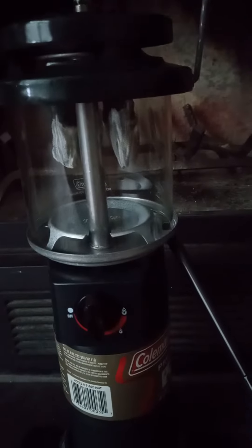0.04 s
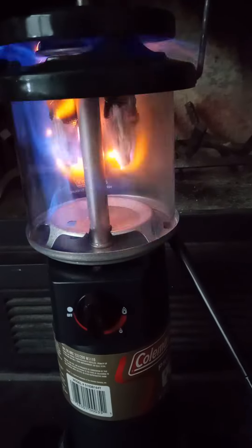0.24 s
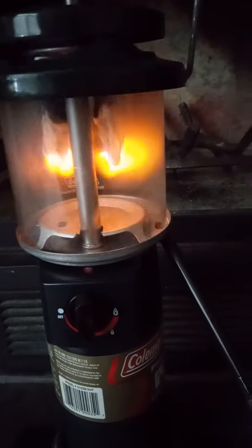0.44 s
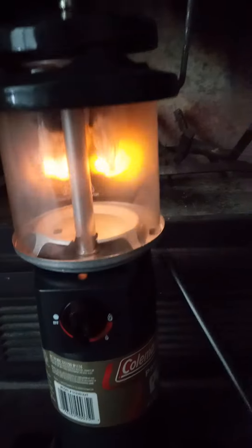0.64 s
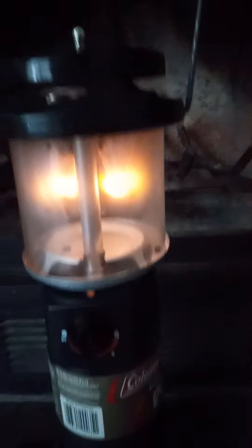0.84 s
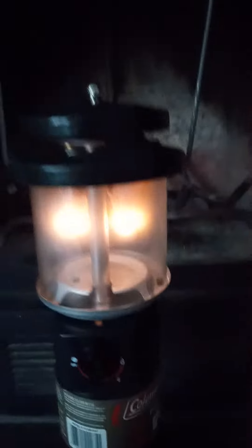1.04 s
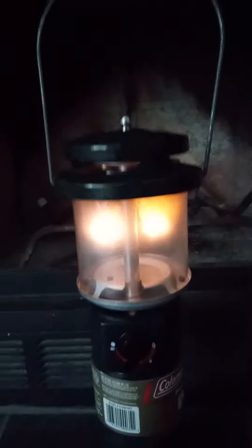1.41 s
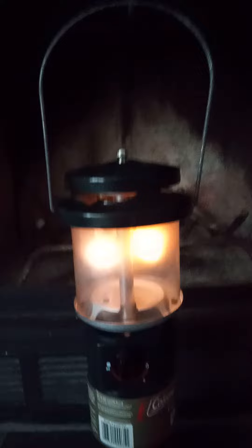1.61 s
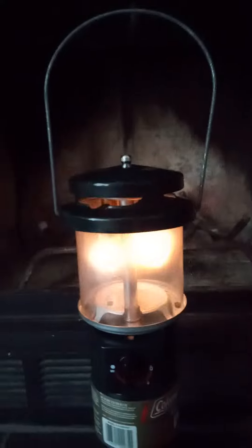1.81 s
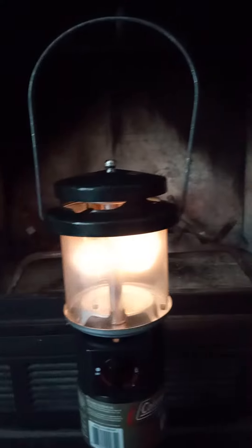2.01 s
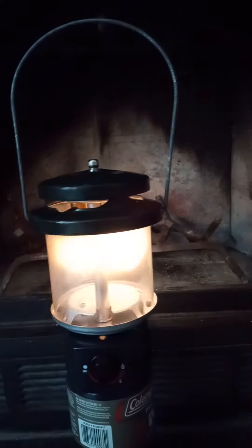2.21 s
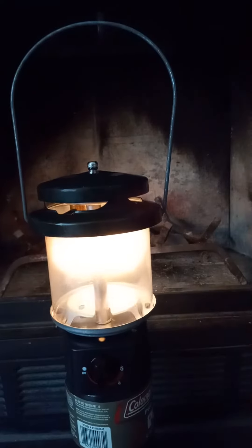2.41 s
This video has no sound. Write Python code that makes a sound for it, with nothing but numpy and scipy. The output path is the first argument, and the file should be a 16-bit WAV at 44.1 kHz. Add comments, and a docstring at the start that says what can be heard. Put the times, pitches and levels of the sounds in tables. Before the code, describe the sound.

Gas lantern igniting with a sharp click and low puff, steady hiss, and a brief clatter.

```python
"""On the hearth of a quiet room, a propane lantern is lit. The gas jet excites resonances of the burner
tubes, an igniter snaps, and the gas catches with a soft whoomph. Someone steps back with dull
footfalls, a faint scrape and a few ticks, and a small hard thing, probably the lighter, clatters down.
Steady sounds are noise shaped by resonance and filtering; impacts are brief impulses that excite
damped resonances and the reverberation of the room."""
import sys
import numpy as np
from scipy import signal
from scipy.fft import rfft, irfft, next_fast_len
from scipy.io import wavfile

SR = 44100
rng = np.random.default_rng(int(sys.argv[2]) if len(sys.argv) > 2 else 0)


def file_out(sig):
    """Save sig as 16-bit WAV at sys.argv[1]."""
    # one column per channel
    cols = np.atleast_2d(sig).T
    # limit, then scale
    lim = np.clip(cols, -1, 1)
    pcm = np.round(lim * 32767).astype(np.int16)
    wavfile.write(sys.argv[1], SR, pcm)


N = 112454
T = np.arange(N) / SR
FREQS = np.fft.rfftfreq(N, 1 / SR)
ROOM_PAN_DB = -4   # every pan is the left level minus the right level


def from_db(db):
    """Amplitude ratio of a level in decibels."""
    return 10 ** (np.asarray(db) / 20)


def pan(db):
    """Constant-power law: left and right gains with the given level difference."""
    gains = from_db([[db / 2], [-db / 2]])
    return gains / np.sqrt(np.mean(gains ** 2))


def unit_power(x):
    """Normalisation to a mean square of one."""
    return x / np.sqrt(np.mean(x ** 2) + 1e-20)


def unit_energy(x):
    """Normalisation of each channel to an energy of one."""
    return x / np.sqrt(np.sum(x ** 2, axis=-1, keepdims=True) + 1e-20)


def at_hz(points, hz):
    """Interpolation on a logarithmic frequency axis."""
    freqs, values = np.transpose(points)
    return np.interp(np.log(hz + 1e-6), np.log(freqs), values)


def coloured(x, spectrum):
    """Minimum-phase filtering: folding the cepstrum gives a causal filter with this spectrum."""
    size = 2 * next_fast_len(N)
    gain = from_db(at_hz(spectrum, np.fft.rfftfreq(size, 1 / SR)))
    cepstrum = irfft(np.log(gain))
    cepstrum[1:size // 2] *= 2
    cepstrum[size // 2 + 1:] = 0
    return irfft(rfft(x, size) * np.exp(rfft(cepstrum)))[..., :N]


def resonance(x, hz, width_hz):
    """Driven damped oscillator: two poles, unit gain at the peak."""
    r = np.exp(-np.pi * width_hz / SR)
    feedback = [1, -2 * r * np.cos(2 * np.pi * hz / SR), r * r]
    return signal.lfilter(np.array([1, 0, -1]) * (1 - r * r) / 2, feedback, x + 1e-18)


def body(x, modes):
    """Modal superposition: x drives parallel resonances (f/Hz, bandwidth/Hz, level/dB)."""
    return sum(from_db(db) * resonance(x, hz, width_hz) for hz, width_hz, db in modes)


def air_noise(coherent_below_hz=430):
    """Diffuse field: white noise whose two channels are coherent only at long wavelengths."""
    mid, side = rfft(rng.standard_normal((2, N)))
    coherence = np.exp(-(FREQS / coherent_below_hz) ** 2)
    spectrum = np.sqrt(1 + coherence) * mid + np.sqrt(1 - coherence) * side * [[1], [-1]]
    return irfft(spectrum, N) / np.sqrt(2)


def narrowband(hz, width_hz):
    """Narrow-band noise of unit power, from two resonances in cascade."""
    return unit_power(resonance(resonance(air_noise(), hz, width_hz), hz, width_hz))


def drift(rate_hz):
    """Slow random modulation: straight lines between Gaussian values."""
    return np.interp(T * rate_hz, np.arange(200), rng.standard_normal(200))


def decay(start_s, decay_s):
    """Exponential decay from a sudden onset."""
    return (T >= start_s) * np.exp(-np.maximum(T - start_s, 0) / decay_s)


def swell(middle_s, half_s):
    """Gaussian envelope."""
    return np.exp(-((T - middle_s) / half_s) ** 2)


def thump(start_s, hz, t60_s, rise_s):
    """Damped oscillation of one low mode, set gradually into motion."""
    age = np.maximum(T - start_s, 0)
    envelope = (1 - np.exp(-age / rise_s)) * np.exp(-np.log(1000) * age / t60_s)
    return envelope * np.sin(2 * np.pi * hz * age)


def room_response(build_s=0.034):
    """Reverberation: a diffuse field builds up, then decays exponentially in each band."""
    # reverberation times: f/Hz, T60/s
    reverberation = [(100, 0.4), (700, 0.27), (2000, 0.48), (6500, 0.48), (9500, 0.34), (14000, 0.32)]
    centres, t60s = np.transpose(reverberation)
    noise = rfft(air_noise())
    bands = [irfft(noise * at_hz(np.c_[centres, share], FREQS), N) for share in np.eye(len(centres))]
    tail = sum(band * from_db(-60 * T / t60) for band, t60 in zip(bands, t60s))
    return pan(ROOM_PAN_DB) * unit_energy(tail * (1 - np.exp(-T / build_s)))


def impact(start_s, pan_db, room, crack_s, echoes_s, echoes_db, room_db):
    """Impulsive source in a room: direct crack, dense early reflections, then reverberation."""
    lag_s = 0.0002915   # sound from the right arrives later on the left
    burst = rfft(rng.standard_normal(N) * decay(0, crack_s))
    flattened = irfft(burst / np.sqrt(np.abs(burst) + 1e-9), N)
    crack = unit_energy(flattened * (T < 10 * crack_s))
    direct = np.array([np.interp(T - lag_s, T, crack, left=0), crack])
    echoes = from_db(echoes_db) * unit_energy(air_noise() * decay(0, echoes_s))
    blow = pan(pan_db) * (direct + echoes) + from_db(room_db) * room
    return np.pad(blow, ((0, 0), (int(start_s * SR), 0)))[:, :N]


def room_hum():
    """Ambient noise: a steady background with its power in the bass."""
    # hum spectrum: f/Hz, level/dB
    spectrum = [(25, -102.5), (60, -54), (88, -52), (150, -61), (210, -57), (300, -66), (2000, -110)]
    return coloured(air_noise(), spectrum)


def gas_jet(flutter_db=2.6):
    """Jet noise excites the burner's resonances; their balance shifts as the listener backs away."""
    # hiss spectrum: f/Hz, level/dB
    hiss = [(250, -69.5), (500, -72.5), (900, -53), (1600, -69.5), (2650, -59), (3000, -71.5), (4300, -63),
            (8000, -72.5), (13500, -74), (15200, -68.5)]
    # modes of burner and globe: f/Hz, bandwidth/Hz, level/dB, pan/dB, growth/(dB/s)
    modes = [(656, 140, -63, 4, 0), (1082, 164, -63, 0.5, 0.5), (1840, 51, -79, -3.5, 0),
             (2210, 100, -63.5, -19, -1), (2332, 114, -59.5, -10, -1.5), (2313, 42, -63, -27, -3),
             (3380, 132, -72.5, 5, -1.5), (3570, 200, -71, -14, 0.5), (3917, 68, -72, -16, 4),
             (4884, 180, -77.5, -1, -3.5), (5680, 410, -75, -11.5, -1)]
    # gain on hiss and modes together: t/s, level/dB
    contour = [(0, 3.5), (.45, -0.5), (1.2, 3), (1.5, -0.5), (2.2, -1)]
    out = pan(-3.5) * coloured(air_noise(), hiss)
    for hz, width_hz, db, pan_db, growth_db_per_s in modes:
        note = pan(pan_db) * narrowband(hz, width_hz)
        out += note * from_db(db + growth_db_per_s * T + flutter_db * drift(rate_hz=15))
    return out * from_db(np.interp(T, *np.transpose(contour)))


def igniter(room):
    """Impulse excitation: the igniter's spring lets go, and the snap rings the lantern's modes."""
    # spring release: t/s, level/dB, pan/dB
    snaps = [(0.206, 14, -8.5)]
    # snap spectrum: f/Hz, level/dB
    spectrum = [(180, -72), (300, -34), (1080, -33), (1400, -14.5), (2150, 1), (3600, -2), (6100, -2),
                (8420, -15), (11000, -11), (13600, -19), (15500, -5.5)]
    # lantern modes: f/Hz, bandwidth/Hz, level/dB
    modes = [(2106, 70, -7), (2276, 240, -0.5), (3063, 59, 2.5), (3910, 57, -2.5), (5100, 130, 0),
             (6280, 94, -8.5)]
    contact = dict(crack_s=0.0005, echoes_s=0.0078, echoes_db=3.5, room_db=-2.8)
    blow = sum(from_db(db) * impact(s, pan_db, room, **contact) for s, db, pan_db in snaps)
    snap = coloured(blow, spectrum)
    return from_db(-3) * snap + from_db(-7.5) * body(snap, modes)


def ignition(catch_s=0.3355, rise_s=0.018, fall_s=0.044):
    """Combustion noise: the flame swells with a puff and a roar, then settles with a rumble and a flare."""
    # flame spectrum: f/Hz, level/dB
    spectrum = [(30, -24), (90, 4.5), (170, 0.5), (290, -10.5), (400, -4.5), (620, -7.5), (800, -4),
                (1050, -0.5), (1300, -35.5), (2600, -66)]
    # the young flame sounds the globe: centre t/s, half-length/s, level/dB
    flares = [(0.473, 0.028, -48.5)]
    envelope = np.exp(np.minimum((T - catch_s) / rise_s, (catch_s - T) / fall_s))
    flame = from_db(-19) * envelope * coloured(air_noise(), spectrum)
    puff = -from_db(-26) * thump(start_s=0.331, hz=103.4, t60_s=0.11, rise_s=0.01)
    roar = from_db(-45) * swell(middle_s=0.339, half_s=0.0444)
    afterburn = from_db(-61) * swell(middle_s=0.48, half_s=0.13)
    rumble = (roar + afterburn) * narrowband(hz=87, width_hz=53)
    flare = sum(from_db(db) * swell(s, half_s) for s, half_s, db in flares)
    globe = flare * narrowband(hz=679, width_hz=75)
    return flame + puff + rumble + globe


def ticks(room):
    """Light impacts excite three modes: a hollow knock, a brief ring and a less damped tink."""
    # contacts: t/s, level/dB, pan/dB, cutoff f/Hz, knock level/dB, ring f/Hz, ring level/dB, tink level/dB
    taps = [(0.6125, -10, -3.5, 6500, -3, 4200, 18, 14), (1.165, -21, -4.5, 8300, 23, 7620, 13, -3),
            (1.5994, -2, -4, 15000, -4, 4570, 6.5, 13.5), (1.6642, -16, -25, 10200, -10, 7000, 6, 13)]
    # tick spectrum: f/Hz, level/dB
    spectrum = [(300, -30), (1100, -26.5), (1550, -13.5), (2050, -16), (4400, -11.5), (5250, -9.5),
                (5900, -3.5), (7200, -1), (9000, -16), (13500, -13), (15200, -1.5)]
    contact = dict(crack_s=0.0012, echoes_s=0.019, echoes_db=3, room_db=-12.5)
    out = 0
    for s, db, pan_db, cutoff_hz, knock_db, ring_hz, ring_db, tink_db in taps:
        lowpass = signal.butter(2, cutoff_hz, fs=SR, output="sos")
        blow = from_db(db) * signal.sosfilt(lowpass, impact(s, pan_db, room, **contact) + 1e-18)
        modes = [(1560, 220, knock_db), (ring_hz, 430, ring_db), (2844, 106, tink_db)]
        out += blow + body(blow, modes)
    return coloured(out, spectrum)


def scraping(room, grains_per_s=1000, grain_s=0.0027, spread_db=4.5, slip_s=0.004):
    """Stick-slip friction of something handled: strokes of uneven grains, and slips where it catches."""
    # strokes: centre t/s, half-length/s, level/dB
    strokes = [(1.33, 0.069, -46), (1.641, 0.017, -42.5)]
    # sudden slips: t/s, level/dB
    slips = [(1.3253, -44), (1.3537, -39)]
    # friction spectrum: f/Hz, level/dB
    spectrum = [(1100, -36), (1600, 2), (2000, -17), (2800, 1.5), (3900, -5), (4700, -26), (6200, -2.5),
                (7200, 1.5), (8000, -10), (9000, -37), (15000, -21)]
    onsets = rng.random(N) < grains_per_s / SR
    strengths = from_db(spread_db * np.minimum(rng.exponential(1, N), 3))
    grains = signal.lfilter([1], [1, -np.exp(-1 / (grain_s * SR))], onsets * strengths)
    envelope = sum(from_db(db) * swell(s, half_s) for s, half_s, db in strokes)
    rubbing = envelope * unit_power(air_noise() * grains)
    slipping = air_noise() * sum(from_db(db) * decay(s, slip_s) for s, db in slips)
    scrape = pan(-4) * coloured(rubbing + slipping, spectrum)
    return scrape + from_db(-19) * signal.fftconvolve(scrape, room, axes=1)[:, :N]


def footfalls(room):
    """Soft, heavy impacts excite low modes: the floor thuds and a board resonates."""
    # steps: t/s, level/dB, relative board level/dB, relative thud level/dB
    steps = [(1.483, -4, 17.5, -34), (1.555, -19, 14.5, -43), (2.187, 1, -6, -38.5)]
    # footfall spectrum: f/Hz, level/dB
    spectrum = [(25, -37), (55, -5), (100, 5.5), (150, -8.5), (200, -0.5), (270, -20.5), (500, -4),
                (620, -28), (820, -2), (1150, -40), (4000, -47)]
    contact = dict(crack_s=0.023, echoes_s=0.027, echoes_db=4, room_db=-8)
    treads, thuds = 0, 0
    for s, db, board_db, thud_db in steps:
        blow = from_db(db) * impact(s, pan_db=-0.37, room=room, **contact)
        treads += blow + from_db(board_db) * resonance(blow, hz=227, width_hz=30)
        thuds += from_db(db + thud_db) * thump(s, hz=105, t60_s=0.06, rise_s=0.0082)
    return coloured(treads, spectrum) + thuds


def clatter(room):
    """The point of impact selects the modes: each bounce has its own, and hard corners add sparkle."""
    # bounces: t/s, level/dB, pan/dB, knock f/Hz, knock level/dB, clank f/Hz,
    # ring f/Hz, ring level/dB, sparkle level/dB
    bounces = [(1.688, 3, -6.5, 580, 14.5, 1142, 5030, 17.5, 0.5),
               (1.7045, 7.5, -6, 1310, -1, 1960, 5830, 14, -6),
               (1.7562, 1, -11, 1200, 4, 1990, 6050, -6, -28),
               (1.7668, 1.5, -5, 1220, -3, 2000, 5400, 10.5, -21),
               (1.7703, -4.5, -4, 1180, -10, 1680, 5500, 3, 7.5)]
    # bounce spectrum: f/Hz, level/dB
    spectrum = [(180, -48.5), (480, -15.5), (900, -6), (1130, -2), (1550, -1.5), (1950, 2), (2380, -3.5),
                (4000, -8), (5200, -14), (6600, -11), (8350, -15.5), (15500, -18.5)]
    contact = dict(crack_s=0.00049, echoes_s=0.0099, echoes_db=2, room_db=-3.5)
    highpass = signal.butter(1, 8200, "high", fs=SR, output="sos")
    out = 0
    for s, db, pan_db, knock_hz, knock_db, clank_hz, ring_hz, ring_db, sparkle_db in bounces:
        blow = from_db(db) * impact(s, pan_db, room, **contact)
        modes = [(knock_hz, 200, knock_db), (clank_hz, 114, -1), (ring_hz, 600, ring_db)]
        sparkle = pan(1.5) * from_db(sparkle_db) * signal.sosfilt(highpass, blow + 1e-18)
        out += blow + body(blow, modes) + sparkle
    return coloured(out, spectrum) + clatter_ring(bounces)


def clatter_ring(bounces, t60_s=0.24, spread_db=1.5):
    """Free decay: faint tones of steady pitch ring on in the room after each bounce."""
    # lingering tones: f/Hz, level/dB
    tones = [(1200, -50), (1647, -50.5), (1873, -61), (1943, -57.5), (2105, -51), (2665, -46), (2939, -54),
             (5620, -70)]
    times, levels_db = np.transpose(bounces)[:2]
    onsets = (times * SR).astype(int)
    shape = (2, len(onsets))   # a random strength and sign for each channel and bounce
    r = np.exp(-np.log(1000) / (t60_s * SR))
    out = 0
    for hz, db in tones:
        strengths = from_db(levels_db + db + rng.normal(0, spread_db, shape))
        impulses = np.full((2, N), 1e-18)
        impulses[:, onsets] = strengths * rng.choice([-1, 1], shape)
        w = 2 * np.pi * hz / SR
        out += signal.lfilter([0, np.sin(w)], [1, -2 * r * np.cos(w), r * r], impulses)
    return pan(ROOM_PAN_DB) * out


def scene():
    """Linear superposition of the lantern, the person's movements and the room's hum."""
    room = room_response()
    lantern = gas_jet() + igniter(room) + ignition()
    return lantern + ticks(room) + clatter(room) + footfalls(room) + scraping(room) + room_hum()


def record(dry, peak_limit=0.8, cutoff_hz=15600):
    """Soft saturation rounds the loudest peaks; a steep low-pass filter limits the bandwidth."""
    rounded = peak_limit * np.tanh(dry / peak_limit)
    lowpass = signal.ellip(10, 0.2, 70, cutoff_hz, fs=SR, output="sos")
    return signal.sosfilt(lowpass, rounded)


dry = scene()
out = record(dry)
file_out(out)
```